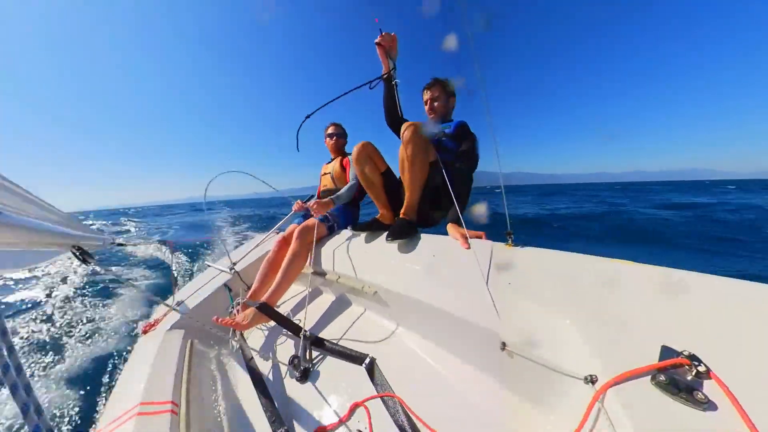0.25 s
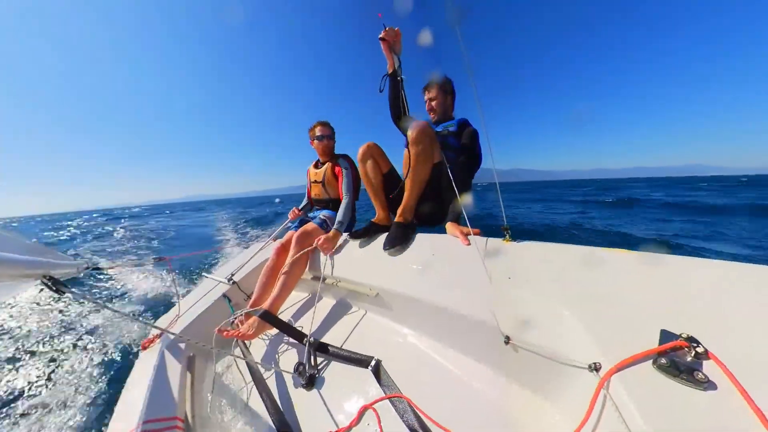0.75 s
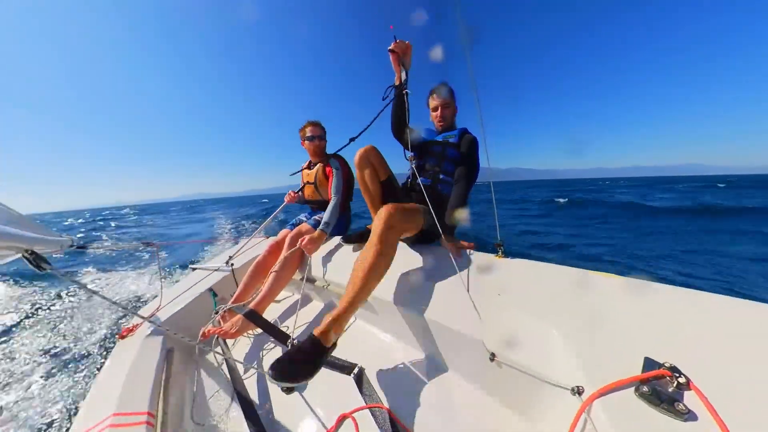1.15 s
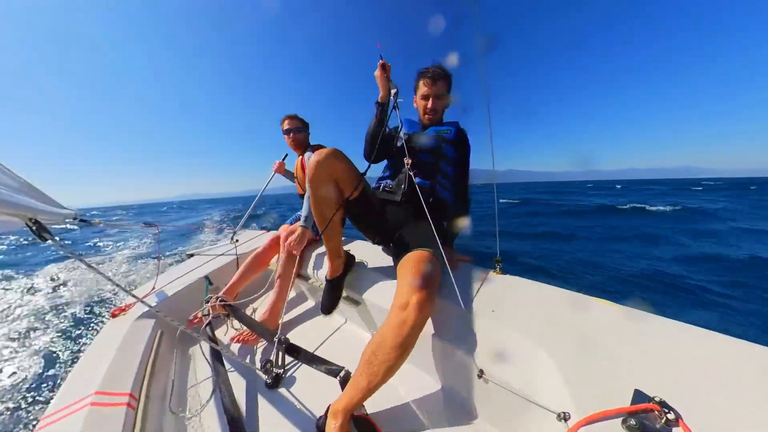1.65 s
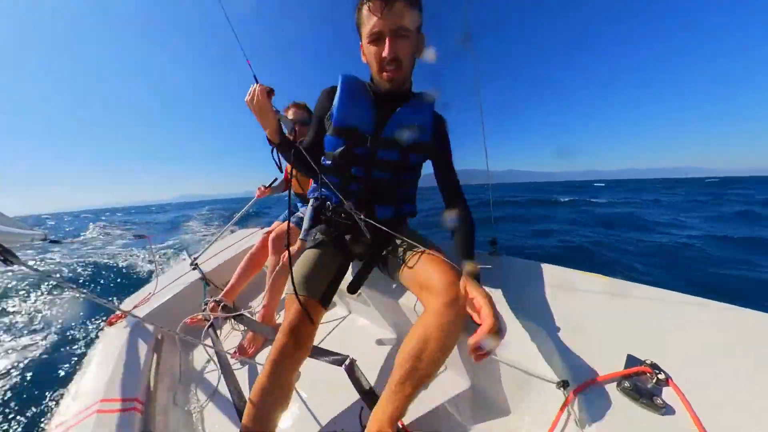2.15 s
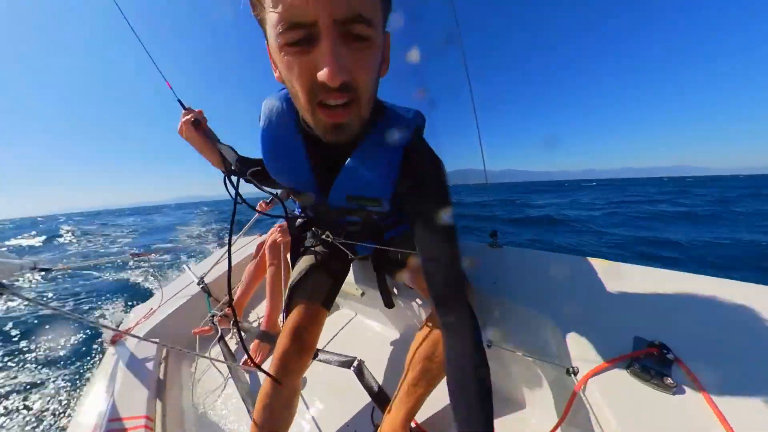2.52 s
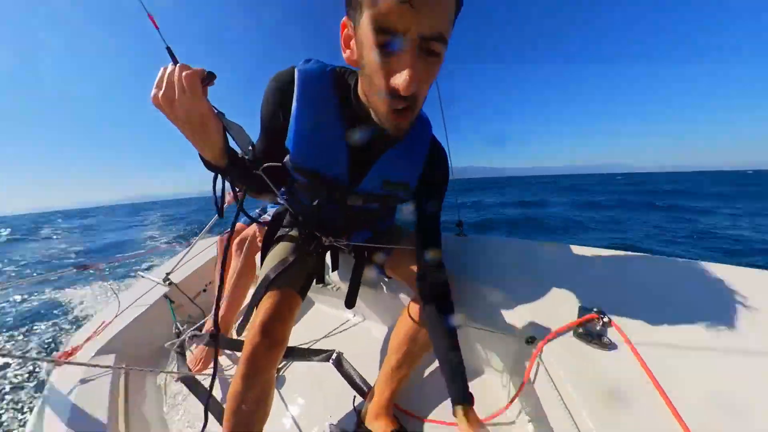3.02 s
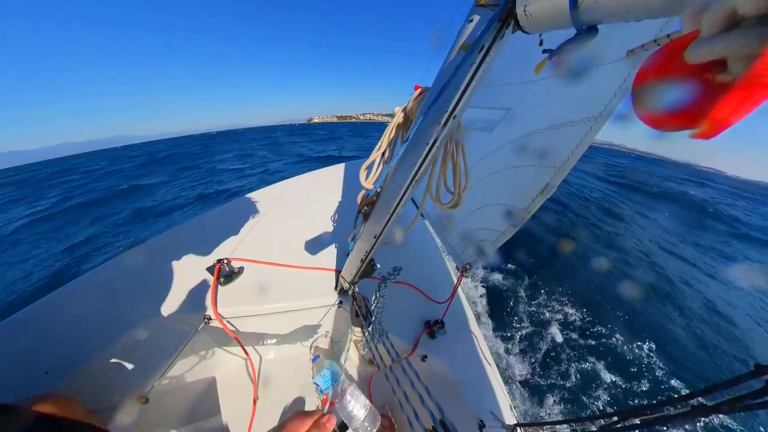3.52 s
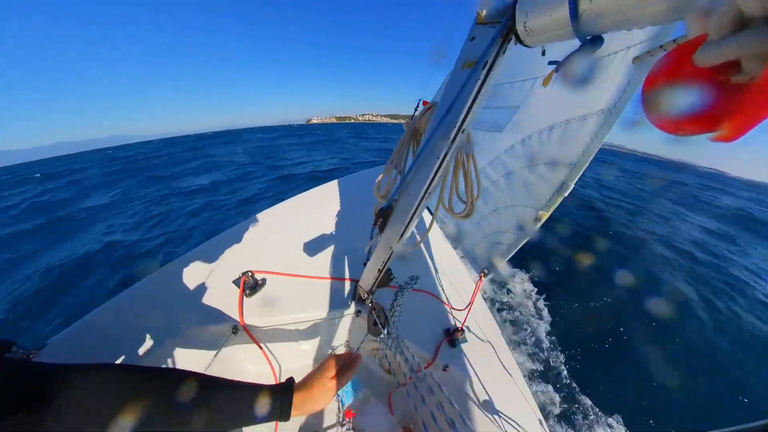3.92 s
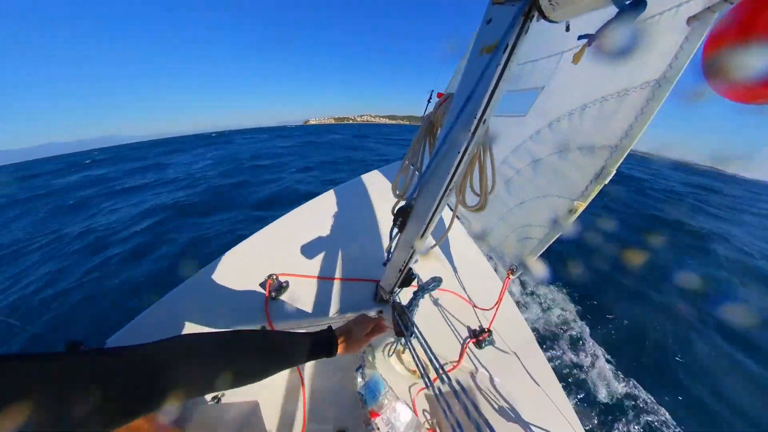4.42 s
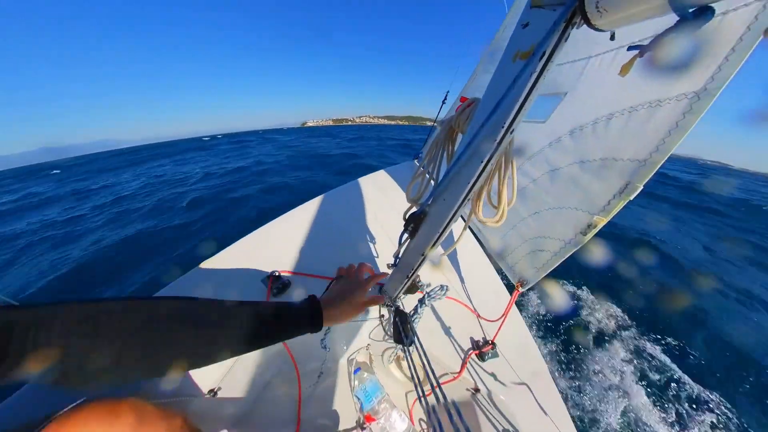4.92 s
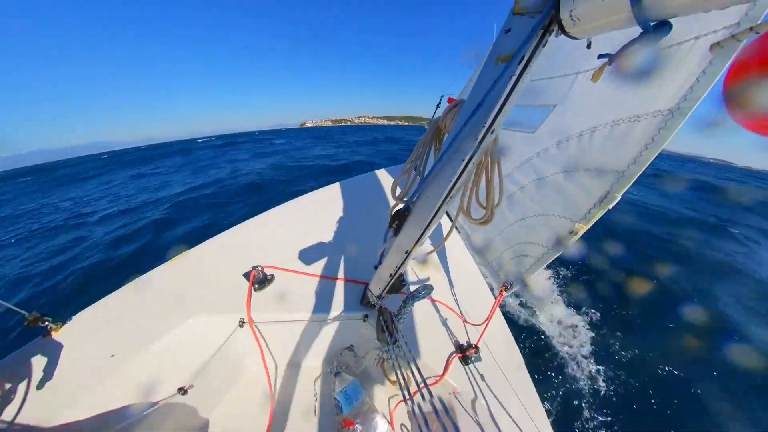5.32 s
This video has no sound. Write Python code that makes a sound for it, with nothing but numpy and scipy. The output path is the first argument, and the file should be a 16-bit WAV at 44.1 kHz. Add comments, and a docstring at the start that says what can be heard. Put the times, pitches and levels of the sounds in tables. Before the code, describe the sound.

On a small sailboat, feet and hardware thump and rattle the hollow hull, a loud rough judder breaks out, while water swashes underneath.

```python
"""Feet, blocks and shackles knock on the hollow hull of a small sailing dinghy, heard by a two-port
action camera clamped to the boat: each knock rings bursts of hull modes under a noise crack. A fitting
judders as rough tones over a rasp, lines and clothing rub as grainy noise, choppy water washes as noise
through the hull modes, and wind is low and high noise with a faint hum. The hardest blows overload the camera."""
import sys
import numpy as np
from scipy import signal
from scipy.fft import rfft, irfft
from scipy.io import wavfile
from scipy.ndimage import uniform_filter1d

SR = 44100
rng = np.random.default_rng(int(sys.argv[2]) if len(sys.argv) > 2 else 0)


def waveform_to_disk(signal):
    """Save audio, clipped to [-1, 1], as 16-bit WAV at the path in sys.argv[1]."""
    frames = np.transpose(np.atleast_2d(signal))
    scaled = np.clip(frames, -1, 1) * 32767
    samples = np.round(scaled).astype(np.int16)
    wavfile.write(sys.argv[1], SR, samples)


N = 245195
LAG_S = 0.00039  # left port behind right

# knocks on hull and fittings: t/s, blow level/dB, then thud, body, clack, tick re blow/dB,
# base ring T60/s (limited on use), base contact/s, favoured modes f/Hz (none or several)
BLOWS = [(0.074, -36, 3, -8, -13, -12, 0.086, 0.01),
         (0.085, 2.5, -6, -17, -34, -36, 0.045, 0.0063, 964, 305, 540),
         (0.107, -16, -6, -3, -18, -22, 0.12, 0.0073),
         (0.13, -26, -5, -11, 1.5, -9, 0.047, 0.0028, 2300, 3000, 4000),
         (0.152, -34, -10, -8, 2, -8, .05, .003),
         (0.178, -30, -29, -16, 11, 12, .08, 0.002, 2240, 3000, 4000),
         (0.204, -22, -7, -17, 0, -3, 0.039, 0.004, 4000),
         (0.244, -28, -10, -6, 7, 3, 0.09, 0.003, 2340, 4000), (0.282, -33, -12, -8, -6, -10, 0.1, 0.0039),
         (0.326, -30, -22, -7, 14, 6, 0.093, 0.004, 2340, 4000),
         (0.348, -15, -17.5, -1.5, -0.5, -8, 0.16, .002, 2340, 3000, 4000),
         (0.361, -18, -25, -1, 5, 0, .07, 0.0021, 2340, 2760), (0.382, -25, -26, -10, 8, -2, 0.053, 0.0033),
         (0.418, -36.5, -6, -11, 10, 0, 0.087, 0.0049),
         (0.485, -23.5, -15, -9, 5, 0.5, 0.08, 0.002, 3000, 4000),
         (0.506, -27, -24, -4, 2, 0, .044, 0.003, 4000), (0.529, -48, -16, -16, 24.5, 15, 0.07, 0.0034),
         (0.611, -32, -24, -22, -28, -26, 0.12, .0075), (0.675, -37, -4.5, 7.5, -2, -40, 0.092, 0.0032),
         (0.92, -26, -15.5, -26, -13, -22, 0.15, .003), (1.35, -32.5, -10.5, -7, -11, -4, 0.063, 0.0028),
         (1.489, -45, -8, 6, 1, 4, .091, 0.0053), (1.83, -34, -2.5, -1, -20, -23, 0.042, 0.0069),
         (2.066, -35, -19, 5, -13, -19, 0.052, .0044),
         (2.202, -23, -17, -6, -1.5, -1, 0.06, 0.0015, 3000, 4000),
         (2.322, -36, -6, -27, -23, -35, .1, 0.0062),
         (2.431, -16, 2, -7, -20, -30, 0.08, 0.006, 470, 780, 1270),
         (2.489, -28, -8, -39, -36, -32, 0.067, 0.0058, 670),
         (2.699, -19, -9.5, -16, -31, -28, 0.13, 0.0056), (2.719, -19.5, -11, -4, -10, -39, 0.39, 0.0035),
         (2.751, -21.5, -10.5, -12, -14, -31, 0.17, 0.0032), (2.776, -5, -19, -32, -36, -41, 0.054, 0.0039),
         (2.794, -22.5, -13, -24, -8, -26, 0.11, 0.0037), (2.819, -34, -4, -15, 7, -12, 0.065, 0.0064),
         (2.842, -36.5, -11, -14, 11, -2, 0.18, 0.0059), (3.264, -16, -10.5, -23, -32, -50, 0.12, 0.0077),
         (3.278, -14, -6, -16, -22, -50, 0.1, 0.004, 620, 870), (3.293, -20, -2, -14, -30, -50, .08, .004),
         (3.324, 5, -28, -5, -5, -13, .05, 0.003, 900, 1450, 2450, 4400),
         (3.344, -13.5, -13, -29, -37, -40, 0.065, 0.0057), (3.359, -23, -25, -14, -22, -49, .06, .005),
         (3.388, -27, -27, -20, -18, -50, 0.075, 0.0041), (3.579, -2.5, -28, 0.5, -1, -1.5, 0.051, 0.0014),
         (3.587, -2, -33, -9.5, -2.5, -20, 0.072, 0.0042, 2760),
         (3.604, 0.5, -22, -27, -6.5, -22, 0.058, 0.0051, 1000, 2850),
         (3.638, -7.5, -24, -20, -25, -8.5, 0.071, 0.0056), (3.661, -13, -26, -3, -15, -34, 0.21, 0.014),
         (3.685, -5, -44, -10, -20, -33, 0.05, 0.003, 850), (3.749, -27, -31, -12, -22, -38, .14, 0.0037),
         (3.813, 3.5, -33, -3, -9, -16, 0.065, 0.0035, 900, 1450, 2370, 2740, 4300),
         (3.826, -7, -26, -14, -46, -46, 0.1, 0.005, 945, 1720),
         (3.878, 2.5, -28, -2, -8, -23, 0.045, 0.0035, 880, 1450, 2360, 2740),
         (3.894, -12, -25, -14, -24, -52, 0.07, 0.007, 850),
         (4.033, -39, -18, -14, -17, -22, 0.062, 0.0027), (4.225, -29, -9, -5, -25, -33, 0.12, 0.0047),
         (4.519, -32, 3, -11, -21, -34.5, .048, 0.0047), (4.588, -16, -26, -10, -9, -39, 0.16, .0027),
         (4.609, -23.5, -31, -21, -37, -42, 0.33, 0.0046), (4.669, -23, -17, -9, -3, -26, 0.13, 0.0085),
         (4.699, -30, -3, -13, 3, -6, 0.1, 0.0071), (4.735, -26.5, -15, -1, 1, -10, .11, 0.0045),
         (4.802, -26, -27, -21, 11.5, 2, 0.068, 0.0034, 2950, 4400),
         (4.834, -38, -20, -15, 10, 4, .06, .003, 2300, 4000),
         (4.858, -42, -20, -15, 8, 12, .06, .003, 4400),
         (4.936, -28, -2, 4, 10, -18, 0.16, 0.002, 1745, 2360, 2740),
         (4.955, -33, 0, -6, -8, -34, .15, .004, 470), (4.977, -32, -1.5, -8, -20, -34, .17, 0.0039),
         (5.065, -36, -25, -3, 6, -28, 0.091, .007)]
# modes of hull and camera clamp: f/Hz, level/dB, share of the ring time
HULL_MODES = [(175, -9, 1.2), (305, -7, 1.1), (462, -2, .9), (485, -1, 1.1), (570, -1, .9), (670, -10, .8),
              (740, -8, .9), (772, -4, 1.2), (821, 0, 1.4), (867, 0, 1.3), (940, -3, 1.1), (980, -6, .9),
              (1050, -7, .8), (1175, -9, .7), (1270, -3, .55), (1410, -2, .55), (1470, -1, .5),
              (1640, -1, .5), (1745, -1, .5), (2240, -2, .4), (2340, -2, .4), (2490, 0, .4), (2620, -2, .4),
              (2760, -1, .4), (3000, -2, .35), (3350, -8, .35), (4000, 0, .3), (4400, -1, .28),
              (5100, -5, .22), (6170, -9, .2), (7700, -24, .15)]
# hull as a filter: f/Hz, spectral level/dB
HULL_COLOUR = [(76, -51), (130, -14.5), (190, -8), (304, -6), (354, -5), (439, -0.5), (564, -3.5), (856, 5),
               (1100, -6), (1220, -2), (1610, -11), (1840, -11), (2100, -5), (2330, -3.5), (2600, -9),
               (2940, -8), (3650, -21), (3970, -15), (7000, -22.5), (9100, -83), (15400, -120)]
# left port, shadowed by the housing: f/Hz, gain/dB
LEFT_SHADOW = [(60, 13), (110, -9), (200, 2.5), (380, -1), (700, -3), (1290, -13.5), (2380, -11.5),
               (4400, -14.5), (8120, -16), (15000, -16)]


def undb(db):
    """Decibels to gain."""
    return np.exp(np.asarray(db) * (np.log(10) / 20))


def unit(x):
    """Scale to rms 1."""
    return x / np.sqrt(np.mean(x ** 2))


def columns(table):
    """Table columns after the time as sample-by-sample curves."""
    s, *cols = np.transpose(table)
    return [np.interp(np.arange(N) / SR, s, c) for c in cols]


def read(points, hz):
    """(Hz, value) points joined straight on a log frequency axis."""
    point_hz, value = np.array(points)[:, :2].T
    return np.interp(np.log(hz), np.log(point_hz), value)


def on_bins(points):
    """(Hz, value) points on the FFT bins."""
    return read(points, np.fft.rfftfreq(N, 1 / SR) + 1)


def walk(rate_hz):
    """Random levels held 1 / rate_hz and smoothed twice; spread near 1."""
    k = int(SR / rate_hz)
    held = np.repeat(rng.standard_normal(N // k + 1), k)
    return 1.268 * uniform_filter1d(uniform_filter1d(held, k), k)[:N]


def grainy(rate_hz, scatter_db, grain_db):
    """Noise with sparse drops of uneven but bounded size mixed in."""
    size = np.minimum(rng.exponential(size=N), 3.5)
    falls = rng.random(N) < rate_hz / SR
    drops = falls * undb(scatter_db * size) * rng.standard_normal(N)
    return rng.standard_normal(N) + undb(grain_db) * unit(drops)


def ports(make):
    """Spectra of one sound at two ports: the left hears it late, shadowed and partly by another path."""
    # f/Hz, amplitude share heard by both ports, squared
    shared_power = [(30, 0.85), (200, 0.55), (500, 0.43), (1000, 0.86), (2500, 0.074), (4000, 0.035),
                    (9000, 0.051)]
    right, other = rfft(make()), rfft(make())
    share = np.sqrt(np.clip(on_bins(shared_power), 0, 1))
    late = np.exp(-2j * np.pi * np.fft.rfftfreq(N, 1 / SR) * LAG_S)
    left = undb(on_bins(LEFT_SHADOW)) * (share * late * right + np.sqrt(1 - share ** 2) * other)
    return np.array([left, right])


def band(pair, colour, lo_hz, hi_hz):
    """A coloured band of a port pair, its mid signal scaled to rms 1."""
    hz = np.fft.rfftfreq(N, 1 / SR) + 1
    edges = np.sqrt((1 + (lo_hz / hz) ** 12) * (1 + (hz / hi_hz) ** 12))
    out = irfft(pair * undb(on_bins(colour)) / edges, N)
    return out / np.std(out.mean(0))


def hull_ring(floor_db):
    """Hull modes as a filter: resonance peaks over a floor colour whatever rubs or washes on the hull."""
    ring_t60_s = 0.12
    hz = np.fft.rfftfreq(N, 1 / SR)
    mode_hz, _, share = np.transpose(HULL_MODES)
    half_width_hz = np.log(1000) / (2 * np.pi * ring_t60_s * share)
    peaks = sum(w * w / (w * w + (hz - f) ** 2) for f, w in zip(mode_hz, half_width_hz))
    return np.sqrt(undb(2 * floor_db) + peaks)


def tails(offset_db, t60_s):
    """Power that jumps at every knock and dies away exponentially."""
    kicks = np.zeros(N)
    s, db = np.transpose([row[:2] for row in BLOWS])
    kicks[(s * SR).astype(int)] = undb(2 * (db + offset_db))
    decay = 1e-6 ** (1 / (t60_s * SR))
    return signal.lfilter([1], [1, -decay], kicks)


def wind():
    """Gusty low buffeting noise, a smooth spray hiss and a wavering sine hum; blows shake the clamp."""
    # buffeting before gusts: t/s, level/dB
    buffet = [(0.0, -63), (0.18, -93), (0.73, -84), (0.88, -74), (1.81, -66.5), (2.42, -64), (2.62, -67.5),
              (2.71, -60), (3.11, -71), (3.33, -70), (3.47, -56), (3.79, -69), (3.93, -70.5), (4.29, -71),
              (4.72, -66), (4.78, -66), (5.17, -66), (5.56, -69)]
    # buffeting spectrum: f/Hz, spectral level/dB
    gust_colour = [(8.8, -53.5), (15, -11.5), (59, -24), (92, 0.5), (145, -4), (160, 11), (210, -27),
                   (350, -120)]
    # spray hiss before flicker: t/s, level/dB
    spray = [(0, -64), (.37, -63), (.59, -70), (1.38, -68), (1.78, -72), (2.14, -69), (2.8, -69),
             (3.38, -72), (3.53, -70), (4.45, -73), (4.71, -68), (5.19, -73), (5.56, -68)]
    # faint hum, perhaps the rigging, before waver: t/s, f/Hz, level/dB
    rigging = [(0.78, 370, -90), (0.88, 372, -62), (1.12, 380, -63), (1.3, 380, -90), (1.72, 420, -90),
               (1.85, 425, -59), (2.4, 430, -58), (2.5, 430, -90)]
    jolt_db, jolt_t60_s = -46.5, 0.094

    buffet_db = columns(buffet)[0] + 3.5 * walk(9)
    gusts = np.sqrt(undb(2 * buffet_db) + tails(jolt_db, jolt_t60_s))
    rumble = band(ports(lambda: rng.standard_normal(N)), gust_colour, 11, 131) * gusts

    hiss_colour = [(6000, 0), (8000, 0), (9600, 3)]
    hiss = band(ports(lambda: rng.standard_normal(N)), hiss_colour, 5800, 9800)
    hiss = hiss * undb(columns(spray)[0] + 3.2 * walk(14))

    hum_hz, hum_db = columns(rigging)
    phase = 2 * np.pi * np.cumsum(hum_hz + 10 * walk(25)) / SR
    return rumble + hiss + undb(hum_db + 5 * walk(25)) * np.sin(phase)


def water():
    """Grainy noise through the hull modes: wash and swash share a slop, all parts flicker; blows stir the wash."""
    # along the hull, before slop and flicker: t/s, wash level/dB, low swash level/dB
    along_hull = [(0.0, -46.5, -51), (0.29, -40.5, -47.5), (0.42, -48, -60), (0.6, -48.5, -60),
                  (1.15, -53, -59), (1.72, -53, -56.5), (2.04, -46.5, -56), (2.65, -46.5, -49),
                  (2.96, -54.5, -53), (3.14, -49.5, -52), (3.45, -48, -45), (3.64, -47, -58.5),
                  (3.76, -53, -49.5), (3.96, -53.5, -56), (4.26, -58.5, -55), (4.43, -47.5, -50),
                  (4.61, -35, -41), (4.77, -44.5, -52), (5.17, -45.5, -49), (5.39, -49, -54),
                  (5.56, -47.5, -59)]
    # slap of waves under the hull, before flicker: t/s, level/dB
    deep_slap = [(0, -59), (.29, -63), (.46, -74), (.71, -75), (1.13, -70), (2.15, -70), (2.5, -66),
                 (2.69, -58), (2.85, -60), (3.16, -63), (3.45, -55), (4.07, -65), (4.65, -54), (4.8, -58),
                 (5.0, -53), (5.16, -56), (5.42, -66), (5.56, -68)]
    # parts of the wash that flicker apart: low f/Hz, high f/Hz, re wash/dB
    wash_bands = [(620, 1100, -1.5), (1100, 1590, -5.5)]
    tail_db, tail_t60_s = -32, 0.28  # noisy tail of a blow in the hull

    wash_db, swash_db = columns(along_hull)
    slop_db = walk(25)
    ring = hull_ring(-3)
    stirred = np.sqrt(undb(2 * wash_db) + tails(tail_db, tail_t60_s))
    drops = ports(lambda: grainy(300, 2.8, -14.0)) * ring
    wash = 0
    for lo_hz, hi_hz, db in wash_bands:
        flicker_db = 1.7 * walk(12) + 2.8 * walk(45)
        wash = wash + band(drops, HULL_COLOUR, lo_hz, hi_hz) * undb(db + slop_db + flicker_db)

    low = ports(lambda: grainy(80, 3.5, -4.)) * ring
    swash = band(low, HULL_COLOUR, 280, 620) * undb(swash_db + slop_db + 2.5 * walk(15))
    slap = band(low, HULL_COLOUR, 130, 280) * undb(columns(deep_slap)[0] + 2.5 * walk(12))
    return wash * stirred + swash + slap


def rubbing():
    """Grainy scuff, grit and brighter rustle swell and fade over a patter, catching and letting go together."""
    # lines and clothing dragged over the deck: peak t/s, scuff, grit, rustle level/dB, length/s
    rubs = [(.1, -42, -47, -49, .066), (.134, -45, -46, -48, .028), (.185, -46, -44, -42, .02),
            (.207, -43, -44, -41, .03), (.247, -44, -47, -42, .063), (.33, -40, -44, -41, .025),
            (.362, -37, -41, -38, .05), (.517, -45, -47, -46, .082), (1.22, -58, -58, -66, .03),
            (1.357, -52, -55, -56, .1), (1.48, -58, -56, -55, .042), (1.85, -58, -60, -64, .053),
            (2.079, -48, -44, -48, .049), (2.127, -47, -47, -53, .018), (2.205, -49, -48, -48, .057),
            (2.281, -44, -45, -46, .041), (2.427, -45, -46, -47, .037), (2.617, -46, -48, -52, .05),
            (2.729, -39, -44, -54, .088), (2.819, -43, -43, -44, .03), (2.845, -43, -45, -51, .11),
            (2.941, -48, -50, -54, .079), (3.283, -38, -48, -62, .025), (3.396, -44, -50, -62, .089),
            (3.75, -49, -55, -69, .029), (4.234, -39, -45, -72, .02), (4.474, -50, -53, -72, .1),
            (4.604, -40, -46, -62, .16), (4.705, -45, -47, -51, .06), (4.815, -45, -44, -45, .05),
            (4.855, -48, -47, -41, .04), (4.904, -51, -53, -59, .036), (5.011, -43, -48, -61, .04),
            (5.068, -44, -50, -72, .12), (5.285, -50, -53, -60, .1)]
    # steady patter on the deck, before flicker: t/s, scuff, grit, rustle level/dB
    patter = [(0, -56, -63, -62), (.12, -56, -63, -62), (.29, -52, -54, -57), (.57, -57, -64, -66),
              (1.1, -60, -69, -69), (1.86, -66, -74, -71), (2.18, -60, -64, -68), (2.58, -63, -70, -71),
              (2.8, -55, -60, -66), (3.02, -62, -70, -74), (3.4, -56, -64, -73), (3.72, -55, -65, -72),
              (3.96, -69, -74, -74), (4.3, -70, -74, -75), (4.44, -63, -69, -74), (4.65, -52, -55, -68),
              (4.78, -53, -55, -62), (5.06, -53, -58, -74), (5.3, -57, -64, -71), (5.56, -59, -66, -68)]
    # f/Hz, spectral level/dB
    rustle_colour = [(3000, 6), (3650, 3.5), (4200, 3.5), (5200, -4), (5700, -11), (6200, -9), (8000, -24),
                     (10000, -24)]
    rise_db, fade_db = 27, 22  # fall of a rub one length before and after its peak

    s, *levels_db, length_s = np.transpose(rubs)[:, :, None]
    t = np.arange(0, N, 64) / SR
    swell_db = np.minimum(rise_db * (t - s), fade_db * (s - t)) / length_s
    catch_db = 2.5 * walk(70)
    grains = ports(lambda: grainy(400, 3., -5.)) * hull_ring(-8)
    bands = [(HULL_COLOUR, 1500, 2650), (HULL_COLOUR, 2650, 3500), (rustle_colour, 3500, 18000)]
    out = 0
    for db, steady_db, (colour, lo_hz, hi_hz) in zip(levels_db, columns(patter), bands):
        steady = undb(2 * (steady_db + 2.5 * walk(12)))
        rub_power = undb(2 * (db + swell_db)).sum(0)
        power = np.interp(np.arange(N) / SR, t, rub_power) + steady
        gain = np.sqrt(power) * undb(catch_db + 2.2 * walk(60))
        out = out + band(grains, colour, lo_hz, hi_hz) * gain
    return out


def judder():
    """A fitting under load: stick-slip holds three rough tones over a gritty rasp; slips mute the lowest tone."""
    # before waver and roughness: t/s, rasp level/dB, hull tone f/Hz, level/dB,
    # overtone f/Hz, level/dB, squeak f/Hz, level/dB
    grip = [(3.575, -40, 890, -30, 1640, -55, 2769, -51), (3.581, -23, 875.5, -5, 1693, -19.5, 2754, -17),
            (3.612, -22, 873.5, -5, 1623, -22, 2697, -20),
            (3.645, -26, 822.4, -3, 1730, -22.5, 2480, -22.5),
            (3.678, -28, 821, -3.5, 1590, -26, 2383, -24), (3.689, -32, 830, -6, 1600, -30, 2330, -28),
            (3.70, -47, 831, -11.5, 1680, -51, 2270, -47), (3.708, -65, 819.3, -17.5, 1710, -56, 2350, -51),
            (3.735, -81, 783, -29, 1726, -79, 2320, -75), (3.75, -89, 820, -56, 1695, -72, 2300, -76)]
    # dropouts of the hull tone: t/s, depth/dB, half width/s
    slips = [(3.603, 14, .003), (3.637, 16, .003), (3.661, 7, .002), (3.683, 16, .003), (3.694, 9, .002)]
    # f/Hz, spectral level/dB
    rasp_colour = [(300, -31), (600, -12), (1000, 5.5), (1900, -6), (2700, 5.5), (3700, -28.5), (4300, -17),
                   (6000, -11), (10000, -18.5)]
    # odd overtones of the hull tone, growing as its cube: multiple, level/dB
    odd = [(5, -26), (7, -33)]

    t = np.arange(N) / SR
    rasp_db, *tones = columns(grip)
    tones[1] = tones[1] - sum(db * np.exp(-((t - s) / w) ** 2) for s, db, w in slips)
    grit = ports(lambda: grainy(900, 2.1, -1.8)) * hull_ring(-8)
    out = band(grit, rasp_colour, 300, 15000) * undb(rasp_db + 0.91 * walk(200))

    # per tone: pitch waver share, roughness/dB, left gain/dB
    settings = [(.009, .8, -6.), (.014, 3.5, 1.5), (.018, 3., -10.)]
    for i, (waver, rough_db, left_db) in enumerate(settings):
        hz, db = tones[2 * i], tones[2 * i + 1]
        phase = 2 * np.pi * np.cumsum(hz * (1 + waver * walk(250))) / SR
        gain = np.sqrt(2) * undb(db + rough_db * walk(150))
        left_phase = phase - 2 * np.pi * hz * LAG_S + .25 * walk(60) + .15
        out += gain * np.array([undb(left_db) * np.sin(left_phase), np.sin(phase)])
        if i == 0:
            overtones = sum(undb(odd_db + 2.5 * walk(150)) * np.sin(round(k) * phase + .8 * walk(300))
                            for k, odd_db in odd)
            out += gain ** 3 * overtones * undb([[read(LEFT_SHADOW, 4400)], [0]])
    return out * ((t > grip[0][0]) & (t < grip[-1][0]))


def crack_filter(modes):
    """The band that a mode family covers, dulled above 5500 Hz."""
    edges_hz = [.85 * modes[:, 0].min(), 1.15 * modes[:, 0].max()]
    return np.vstack([signal.butter(4, edges_hz, "bandpass", fs=SR, output="sos"),
                      signal.butter(2, 5500, fs=SR, output="sos")])


def strike(modes, sos, t60_s, push_s, crack_db, spot_hz):
    """One blow at both ports: every mode rings with its own chance strength, under a noisy crack."""
    # left port for sound carried by the clamp: f/Hz, gain/dB
    clamp_left = [(60, -5.5), (110, -3.5), (200, -41.5), (380, 14), (700, -7.5), (1290, -10), (2380, -10.5),
                  (4400, -20), (8120, -21), (15000, -20.5)]
    spot_db, spot_share = 12, .045  # lift of favoured modes, its width as a share of pitch

    hz, db, share = np.transpose(modes)
    length_s = min(.2, push_s + t60_s * share.max())
    t = np.arange(int(length_s * SR)) / SR
    # the 1 Hz entry stands in when no mode is favoured
    lift = np.max([np.exp(-(np.log(hz / f) / spot_share) ** 2) for f in [1, *spot_hz]], axis=0)
    db = db + spot_db * lift
    detune, turn, strength, left_turn = rng.standard_normal((4, len(modes)))
    decay = np.log(1000) / (t60_s * share)
    rings = np.exp(np.outer(2j * np.pi * hz * (1 + 0.0096 * detune) - decay, t))
    right = undb(db + 2.5 * strength) * np.exp(.6j * turn)
    left_shift = np.exp(.9j * left_turn - 2j * np.pi * hz * LAG_S)
    left = right * undb(read(clamp_left, hz)) * left_shift
    swell = np.sin(np.pi / 2 * np.minimum(t / push_s, 1)) ** 2  # force grows during contact
    ring = (np.array([left, right]) @ rings).imag
    power = np.abs(right) ** 2

    # however the modes happen to beat, the blow delivers its energy
    expected = np.sum(power @ np.abs(rings) ** 2 * swell ** 2 / 2)
    beat = np.sum((ring[1] * swell) ** 2) / expected

    noise = rng.standard_normal(len(t))
    fade = np.exp(-np.log(1000) * t / (.8 * t60_s * share.mean()))
    crack = undb(crack_db) * unit(signal.sosfilt(sos, noise)) * fade
    crack = crack * undb([[read(clamp_left, hz.mean())], [0]])
    return (ring / np.sqrt(beat * power.sum()) + crack) * swell


def knocks():
    """Each knock drives five hull mode families, each with its own force swell and crack."""
    # edges of thud, ring, body, clack and tick modes: f/Hz
    family_edges = [0, 620, 1220, 2000, 3600, 9000]
    # thud, ring, body, clack, tick: swell as a share of contact time, crack level/dB
    cracks = [(1.7, -16), (1, -15), (.8, -19), (.7, -15), (.6, -11)]
    lean = undb([[-1], [1]])  # knocks lean to the right

    out = np.zeros((2, N + SR))
    modes = np.array(HULL_MODES)
    family_index = np.digitize(modes[:, 0], family_edges)
    families = [modes[family_index == k] for k in range(1, 6)]
    filters = [crack_filter(family) for family in families]
    for s, db, thud_db, body_db, clack_db, tick_db, t60_s, contact_s, *spot_hz in BLOWS:
        t60_s = np.clip(t60_s, .015, .3)
        contact_s = np.clip(contact_s, .0005, .02)
        i = int(s * SR)
        levels_db = (thud_db, 0, body_db, clack_db, tick_db)
        for family, sos, family_db, (push, crack_db) in zip(families, filters, levels_db, cracks):
            blow = strike(family, sos, t60_s, push * contact_s, crack_db, spot_hz)
            out[:, i:i + blow.shape[1]] += blow * undb(db + family_db) * lean
    return out[:, :N]


def scene():
    """Wind and water under rubbing, judder and knocks."""
    return wind() + water() + rubbing() + judder() + knocks()


def record(dry):
    """The converter rounds off the loudest swings; overtones outside the capsule's range are partly kept."""
    capsule_hz, top_hz = 9800, 16000
    ceiling, knee, leak_db = .9, 3.5, -6.
    cut = signal.ellip(8, .3, 50, capsule_hz, fs=SR, output="sos")
    heard = signal.sosfiltfilt(cut, dry)
    rounded = heard / (1 + np.abs(heard / ceiling) ** knee) ** (1 / knee)
    highpass = signal.butter(2, 150, "highpass", fs=SR, output="sos")
    overtones = signal.sosfiltfilt(highpass, rounded - heard)
    kept = signal.sosfiltfilt(cut, overtones)
    mixed = heard + kept + undb(leak_db) * (overtones - kept)
    return signal.sosfilt(signal.ellip(8, .2, 70, top_hz, fs=SR, output="sos"), mixed)


dry = scene()
out = record(dry)
waveform_to_disk(out)
```